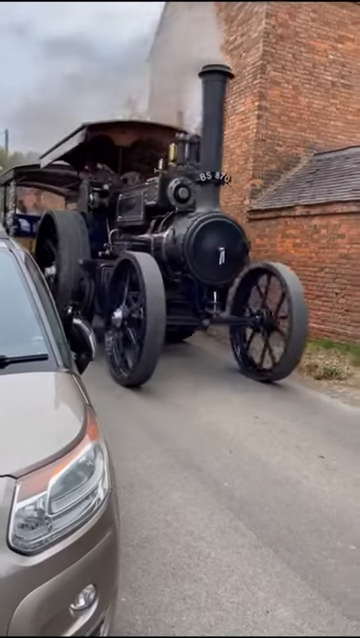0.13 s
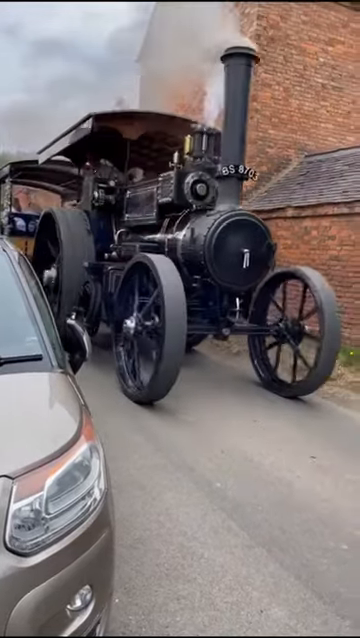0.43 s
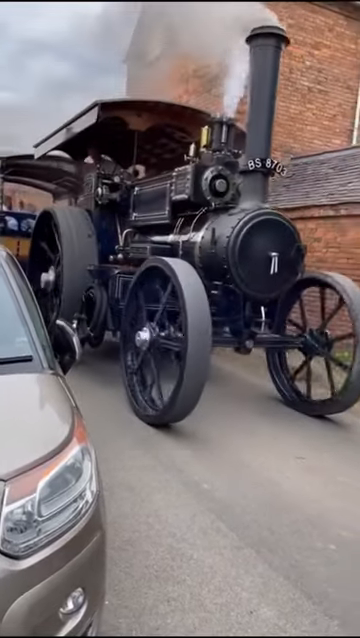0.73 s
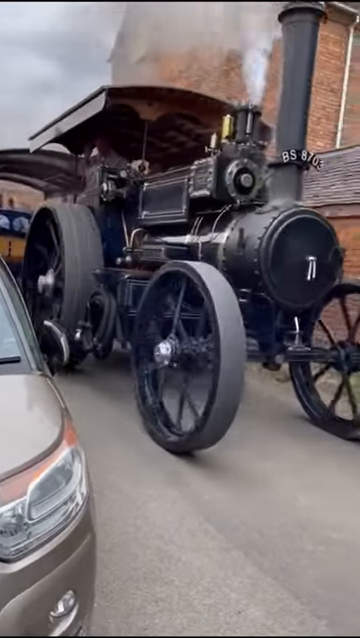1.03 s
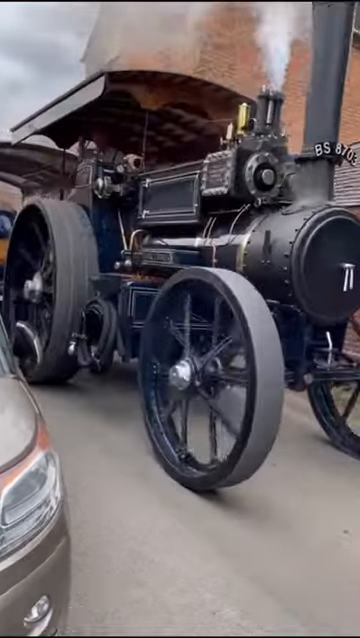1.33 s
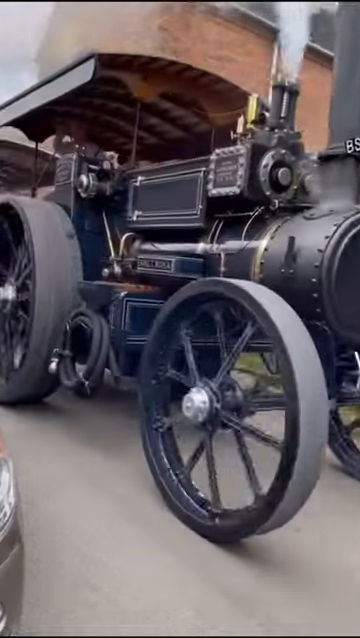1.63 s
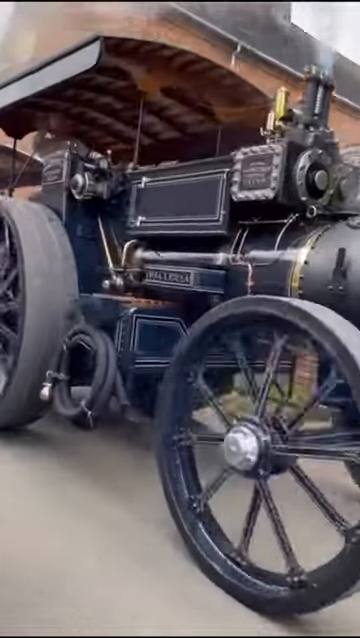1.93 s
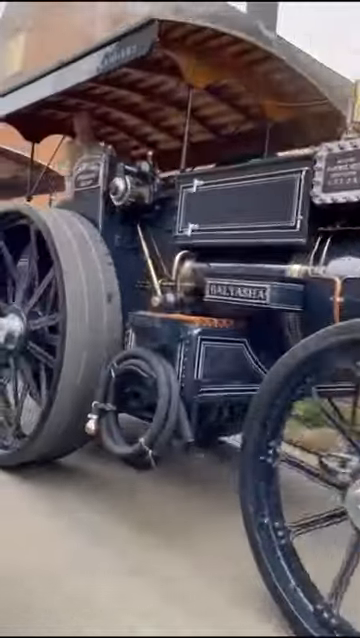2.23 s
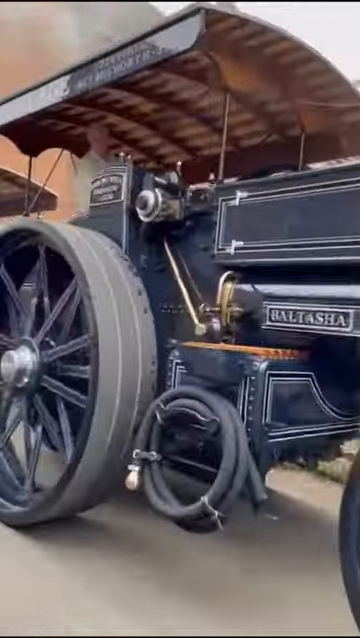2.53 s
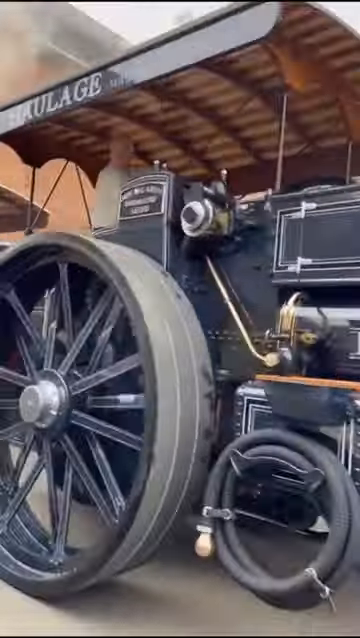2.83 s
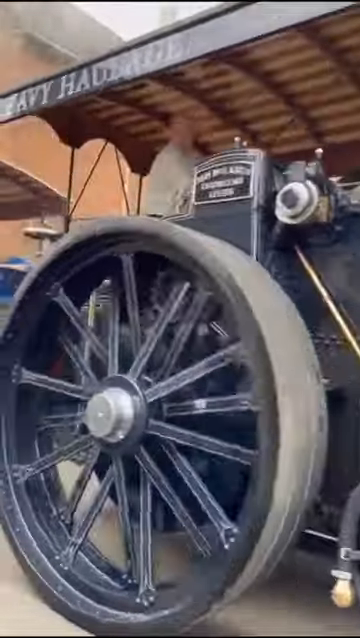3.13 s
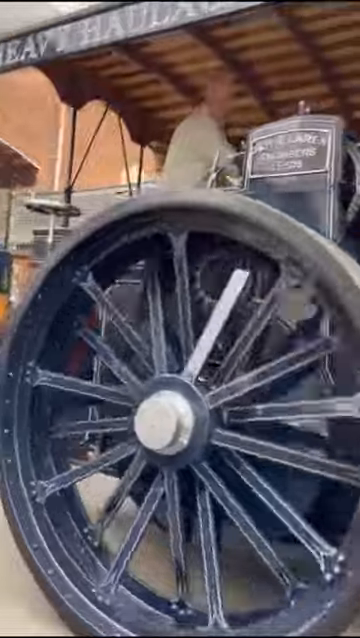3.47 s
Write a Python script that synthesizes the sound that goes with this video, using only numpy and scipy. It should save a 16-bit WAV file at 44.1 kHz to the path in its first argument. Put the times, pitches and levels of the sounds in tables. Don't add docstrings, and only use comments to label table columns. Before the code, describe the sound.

A steam traction engine rolls past close in a narrow street, about six soft deep chuffs a second with metallic rod knocks over continuous steam hiss and rumble; faint wall echoes, bright slightly grainy phone sound.

```python
import sys
import numpy as np
from scipy import signal
from scipy.fft import rfft, irfft
from scipy.io import wavfile
from scipy.ndimage import uniform_filter1d, map_coordinates

SR = 44100
rng = np.random.default_rng(int(sys.argv[2]) if len(sys.argv) > 2 else 0)


def voltage_ratio(level):
    return 10 ** (np.asarray(level, float) / 20)


def master_out(mix):
    frames = np.transpose(np.atleast_2d(mix))
    ceiling = np.clip(frames, -1, 1)
    pcm = np.round(ceiling * 32767).astype(np.int16)
    wavfile.write(sys.argv[1], SR, pcm)


N = 158760
BLAST_SAMPLES = 12000
BEAT_DB = 1


def evened(x):
    return x / np.sqrt(np.mean(x ** 2) + 1e-20)


def read(points, hz):
    f, value = np.transpose(points)
    return np.interp(np.log(hz + 1), np.log(f + 1), value)


def add(mix, start_s, sound):
    part = mix[round(start_s * SR):][:len(sound)]
    part += sound[:len(part)]


def swell(count):
    rise_s, hold_s, fall_db_per_s = 0.036, 0.027, 170.5
    t = np.arange(count) / SR
    rise = np.sin(np.pi / 2 * np.minimum(t / rise_s, 1))
    return rise * voltage_ratio(-fall_db_per_s * np.maximum(t - rise_s - hold_s, 0))


def resonate(rush, shape, hz, width_hz, steady=0.58):
    r = np.exp(-np.pi * width_hz / SR)
    turn = np.exp(2j * np.pi * hz * np.arange(len(rush)) / SR)
    slow = signal.lfilter([1], [1, -r], rush / turn)
    slow = signal.lfilter([1], [1, -r], slow)
    slow = slow / np.sqrt(np.mean(abs(slow) ** 2))
    lead = np.exp(1j * np.angle(slow[-1]))
    note = (turn * (steady * lead + (1 - steady) * slow[::-1])).real * shape
    return note * .5 * np.linalg.norm(shape) / np.linalg.norm(note)


def singing(curve, width_hz):
    s, hz, db = np.transpose(curve)
    t, r = np.arange(N) / SR, np.exp(-np.pi * width_hz / SR)
    turn = np.exp(2j * np.pi * np.cumsum(np.interp(t, s, hz)) / SR)
    slow = signal.lfilter([1], [1, -2 * r, r * r], rng.standard_normal(N) / turn)
    return voltage_ratio(np.interp(t, s, db)) * evened((turn * slow).real)


def noise(colour, size, patch_db, flicker_db, turning):
    hop = size // 4
    frames, hz = N // hop + 5, np.fft.rfftfreq(size, 1 / SR)
    a, b, patches = rng.standard_normal((frames, len(hz), 3)).T
    patches = uniform_filter1d(patches, size=8, axis=0)
    patches = evened(uniform_filter1d(patches, size=12, axis=1))
    flicker = evened(uniform_filter1d(rng.standard_normal(frames), size=6))
    tilt_db = read(turning, hz)[:, None] * np.arange(frames) * hop / SR
    level_db = read(colour, hz)[:, None] + patch_db * patches + flicker_db * flicker + tilt_db
    z = (a + 1j * b) * voltage_ratio(level_db)
    return evened(signal.istft(z, nperseg=size, noverlap=size - hop)[1][:N])


# time_s, hiss_db, rumble_db
PASSING = [(0.0, -18.5, -17.5), (0.102, -18.5, -24.5), (0.14, -20.5, -23), (0.5, -18.5, -26),
           (0.65, -20, -27.5), (0.781, -20.5, -27.5), (0.91, -20, -21.5), (1.039, -19.5, -26),
           (1.262, -19.5, -23), (1.431, -20.5, -26.5), (1.512, -20, -22.5), (1.751, -20, -25.5),
           (1.942, -21, -23), (2.59, -21, -23.5), (2.71, -21, -23), (3.26, -22, -23.5), (3.54, -21.5, -26),
           (3.6, -24.5, -22)]


def passing(column):
    rows = np.transpose(PASSING)
    return voltage_ratio(np.interp(np.arange(N) / SR, rows[0], rows[column]))


# freq_hz, level_db
RUMBLE_COLOUR = [(15, -41), (25, -21.5), (45, -9.5), (100, -9), (134, -6), (189, -11), (257, -5.5),
                 (484, -14.5), (694, -14), (945, -18.5), (1500, -18), (1950, -34), (3300, -120)]


def wheels():
    rumble = noise(RUMBLE_COLOUR, size=2048, patch_db=2, flicker_db=1.5, turning=[(100, 0)])
    return voltage_ratio(-1.5) * passing(2) * rumble


# time_s, mesh_hz, level_db
GEAR_MESH = [(0, 1822, -40), (.4, 1727, -38.5), (.8, 1555, -39), (1.0, 1850, -41), (1.4, 1822, -46.5),
             (3.6, 1712, -53.5)]


def gears():
    return singing(GEAR_MESH, width_hz=160)


# time_s, pitch_hz, level_db
RIM_HUM = [(0, 226, -51), (1.7, 226, -38), (2.6, 226, -31.5), (2.95, 226, -40), (3.05, 430, -42),
           (3.2, 430, -27), (3.32, 420, -26), (3.45, 350, -32), (3.6, 366, -48.5)]


def rim():
    return singing(RIM_HUM, width_hz=90)


# time_s, pitch_hz, level_db
SEAT_WHISTLE = [(0, 3880, -51.5), (1.6, 3755, -44.5), (2.6, 3750, -40), (3.6, 3730, -44)]


def whistle():
    return singing(SEAT_WHISTLE, width_hz=260)


# freq_hz, level_db
JET_COLOUR = [(300, -9), (700, -4), (1000, -4.5), (1400, -9), (1750, -1.5), (2300, -3.5)]
# freq_hz, slope_db_per_s
JET_TURNING = [(600, -0.7), (1700, -0.97), (2600, 1.03), (3800, 0.26), (4500, -0.44), (6000, -0.4),
               (9200, -0.21), (11500, -1.07)]
# time_s, delay_ms
ROAD_ECHO_DELAY = [(0, 0.75), (1.2, 0.47), (2.4, 0.444), (3.6, 0.44)]


def valve():
    jet = noise(JET_COLOUR, size=512, patch_db=1.36, flicker_db=0.22, turning=JET_TURNING)
    s, delay_ms = np.transpose(ROAD_ECHO_DELAY)
    late = np.arange(N) - np.interp(np.arange(N) / SR, s, delay_ms) * SR / 1000
    return passing(1) * (jet + 0.06 * map_coordinates(jet, [late], order=3))


# start_s, level_db
THUMP_TIMES = [(.135, -21.5), (0.297, -27), (.455, -28.5), (0.637, -30), (0.776, -27), (1.016, -25),
               (1.093, -20.5), (1.215, -23), (1.296, -25), (1.497, -19.5), (1.657, -24), (1.817, -32),
               (1.996, -26), (2.173, -25.5), (2.373, -22), (2.536, -29), (2.704, -22), (2.936, -20.5),
               (3.057, -22), (3.207, -19), (3.413, -19), (3.503, -31)]


def thumps():
    out = np.zeros(N)
    for start_s, level_db in THUMP_TIMES:
        rush = rng.standard_normal(BLAST_SAMPLES)
        thump = resonate(rush, swell(len(rush)), hz=72, width_hz=44)
        add(out, start_s, voltage_ratio(level_db + BEAT_DB) * thump)
    return out


# start_s, pitch_hz, level_db
PLATE_GROANS = [(0.0, 780, -23.5), (0.161, 270, -18), (.33, 298, -23), (.57, 319, -24), (.8, 737, -25.5),
                (1.299, 290, -24), (1.771, 232.3, -24), (2.101, 388.7, -23.5), (2.199, 370, -22),
                (2.21, 239.8, -21), (2.561, 320, -22.5), (2.71, 434.4, -19.5), (2.709, 341, -29.5),
                (2.93, 320.6, -21), (3.001, 229, -24.5), (3.171, 330, -22), (3.24, 568.4, -22),
                (3.42, 500, -25.5), (.82, 562, -28.5), (.87, 420, -28), (.88, 765, -28),
                (1.042, 900, -28.5), (1.27, 920, -28), (1.72, 717, -30), (2.03, 1098, -34),
                (2.499, 201.4, -24.5), (2.57, 236.6, -20), (2.93, 690, -28), (3.27, 210, -21)]


def frame():
    out = np.zeros(N)
    for start_s, hz, level_db in PLATE_GROANS:
        rush = rng.standard_normal(BLAST_SAMPLES)
        groan = resonate(rush, swell(len(rush)), hz, width_hz=90, steady=.3)
        add(out, start_s, voltage_ratio(level_db) * groan)
    return out


# start_s, level_db
ROD_KNOCKS = [(0.0, -14), (0.079, -13), (0.161, -13), (0.261, -12.5), (0.405, -10), (0.587, -9.5),
              (0.638, -12.5), (0.829, -15.5), (0.929, -15.5), (1.079, -10.5), (1.27, -11.5), (1.439, -8.5),
              (1.605, -11.5), (1.789, -12.5), (1.959, -18), (2.129, -10), (2.286, -12.5), (2.473, -14),
              (2.559, -20), (2.639, -10.5), (2.805, -13), (2.98, -10.5), (3.079, -22.5), (3.338, -39),
              (3.509, -16)]
# freq_hz, level_db, t60_s
ROD_MODES = [(636, -1.5, 0.089), (779, -1, 0.075), (924, -7.5, 0.11), (1236, -1.5, 0.11), (1476, -6, 0.041),
             (1665, 0.5, 0.13), (1845, -0.5, 0.1), (2054, 6.5, 0.068), (2393, -3, 0.098), (3687, -3, 0.11)]


def rods():
    level_offset_db, spread_db, pitch_spread, rise_s = -13.5, 1.5, 0.054, .01
    out, t = np.zeros(N), np.arange(8000) / SR
    for start_s, level_db in ROD_KNOCKS:
        ring = np.zeros(len(t))
        for hz, db, t60_s in ROD_MODES:
            a, b, c = rng.standard_normal(3)
            decay = voltage_ratio(db + spread_db * a - 60 * t / t60_s)
            ring += decay * np.sin(2 * np.pi * hz * (1 + pitch_spread * b) * t + 9 * c)
        add(out, start_s, voltage_ratio(level_db + level_offset_db) * np.minimum(t / rise_s, 1) * ring)
    return out


# freq_hz, width_hz, level_db
CHIMNEY_OVERTONES = [(226, 30, -7), (280, 60, -14.5), (350, 70, -7), (430, 88, -10)]


def beat(rush, level_db, boiler_hz, boiler_db, chimney_hz):
    shape = swell(len(rush))
    upper = resonate(rush, shape, boiler_hz, width_hz=60)
    for hz, width_hz, db in CHIMNEY_OVERTONES:
        upper = upper + voltage_ratio(db - 1.5) * resonate(rush, shape, hz, width_hz, steady=0)
    puff = signal.lfilter(*signal.butter(2, [400, 1000], "band", fs=SR), rush)
    upper = upper + voltage_ratio(-13) * shape * evened(puff)
    ring = resonate(rush, shape, chimney_hz, width_hz=40)
    return voltage_ratio(BEAT_DB) * (voltage_ratio(level_db - 1) * ring + voltage_ratio(boiler_db) * upper)


# start_s, chimney_db, boiler_hz, boiler_db, chimney_hz
EXHAUST_BEATS = [(0.0, -18, 270, -27.5, 125.8), (0.145, -21, 266, -22.5, 129),
                 (0.32, -19, 280, -21.5, 129.2), (0.482, -19.5, 276, -25, 129),
                 (0.678, -31, 243, -26.5, 135), (0.835, -24, 280, -20.5, 132.8),
                 (1.018, -19, 245, -24, 138.4), (1.185, -14.5, 280, -24.5, 133.4),
                 (1.355, -19.5, 280, -27.5, 142.2), (1.508, -15, 272, -25, 138.9),
                 (1.699, -19, 229, -30, 133.4), (1.851, -15.5, 312, -26, 134.5),
                 (2.018, -22, 304, -23, 143), (2.193, -14.5, 230, -23, 134.2),
                 (2.381, -14.5, 291, -26, 131.5), (2.549, -15, 222, -20.5, 130.4),
                 (2.713, -16, 233, -24, 128.5), (2.89, -16.5, 226, -24, 132.6),
                 (3.085, -14, 432, -22, 136.2), (3.251, -16.5, 226, -19.5, 141.4),
                 (3.397, -17, 376, -18, 128.3)]


def exhaust():
    out = np.zeros(N)
    for start_s, *settings in EXHAUST_BEATS:
        add(out, start_s, beat(rng.standard_normal(BLAST_SAMPLES), *settings))
    return out


def street(x):
    taps, at = np.zeros(22000), np.arange(400, 21960, 22)
    taps[at + rng.integers(0, 22, len(at))] = rng.choice([-1., 1.], len(at))
    t60_s = .35
    taps = taps * voltage_ratio(-60 * np.arange(len(taps)) / SR / t60_s)
    return signal.fftconvolve(x, taps / np.linalg.norm(taps))[:N]


def scene():
    steady = wheels() + gears() + rim() + whistle() + valve()
    struck = thumps() + frame() + rods() + exhaust()
    return (struck + voltage_ratio(-10) * street(struck) + steady)[None]


# freq_hz, step_db
ROUNDING_STEP = [(300, -1.5), (1500, -2.5), (3200, -2.5), (5000, 4.5), (6500, 2), (9000, 4), (12000, 1.5)]


def grainy(x):
    n, k = np.arange(2048), np.arange(600)
    rising = np.cumsum(np.kaiser(1025, 4 * np.pi))
    rising = np.sqrt(rising[:-1] / rising[-1])
    window = np.r_[rising, rising[::-1]]
    basis = window * np.cos(np.pi / 1024 * (n + 512.5) * (k[:, None] + .5)) / np.sqrt(512)
    halves = np.pad(x[0], (1500, 2048 + -(N + 1500) % 1024)).reshape(-1, 1024)
    c = np.hstack([halves[:-1], halves[1:]]) @ basis.T
    hiss = uniform_filter1d(np.mean(c[:, 170:270] ** 2, axis=1), size=21)[:, None]
    step_follows = .45
    usual = np.sqrt(hiss.mean()) * (hiss / hiss.mean()) ** (step_follows / 2)
    step = usual * voltage_ratio(read(ROUNDING_STEP, k * SR / 2048))
    frames = (np.sign(c) * np.floor(abs(c) / step + .4) * step) @ basis
    joined = frames[1:, :1024] + frames[:-1, 1024:]
    return joined.reshape(1, -1)[:, 476:][:, :N]


# freq_hz, level_db
PHONE_COLOUR = [(2400, -1), (2900, -5.5), (3300, -3), (3750, 4), (4100, 3.5), (4500, 2.5), (5300, 7.5),
                (6800, -5.5), (7600, -17.5)]
# freq_hz, level_db
PORT_COLOUR = [(7600, 1), (8500, 12), (9300, 20), (10500, 24.5), (11500, 22), (11950, 15.5), (12100, -24)]


def microphone(x):
    hz = np.fft.rfftfreq(N, 1 / SR)
    return irfft(rfft(x) * voltage_ratio(read(PHONE_COLOUR, hz) + read(PORT_COLOUR, hz)), N)


def roll_off(x):
    return signal.sosfilt(signal.butter(12, 12860, fs=SR, output="sos"), x)


def record(dry):
    mix = grainy(microphone(dry))
    return roll_off(mix)


dry = scene()
out = record(dry)
master_out(out)
```